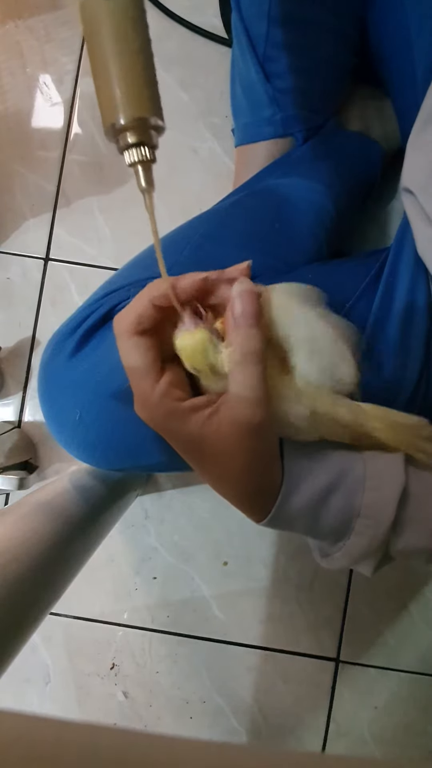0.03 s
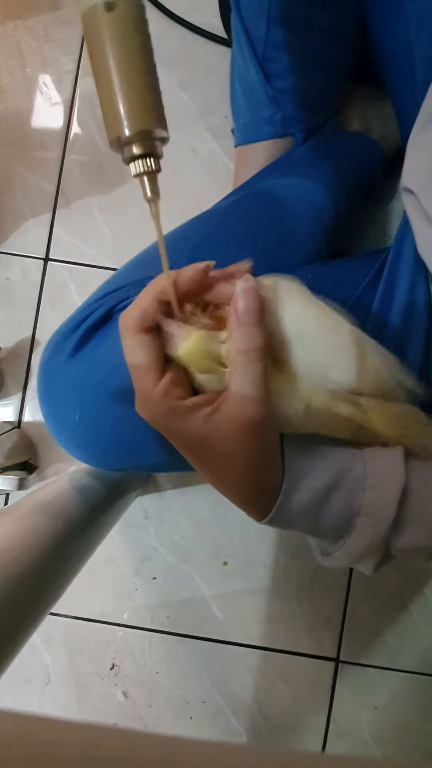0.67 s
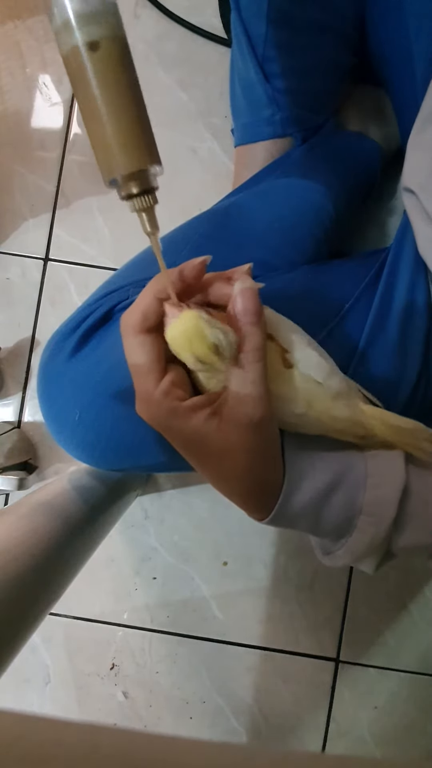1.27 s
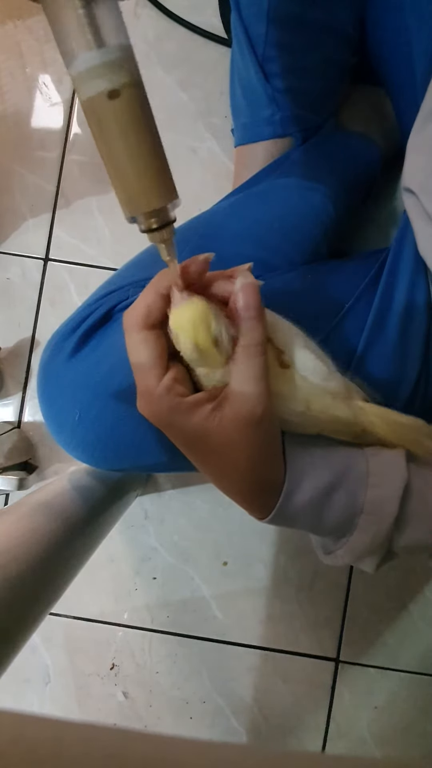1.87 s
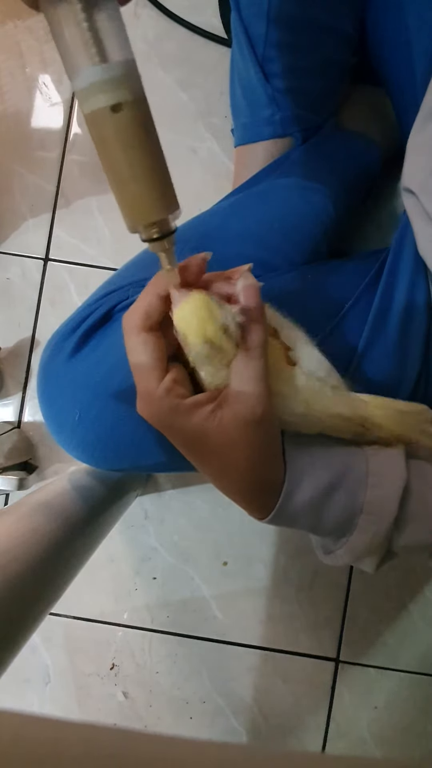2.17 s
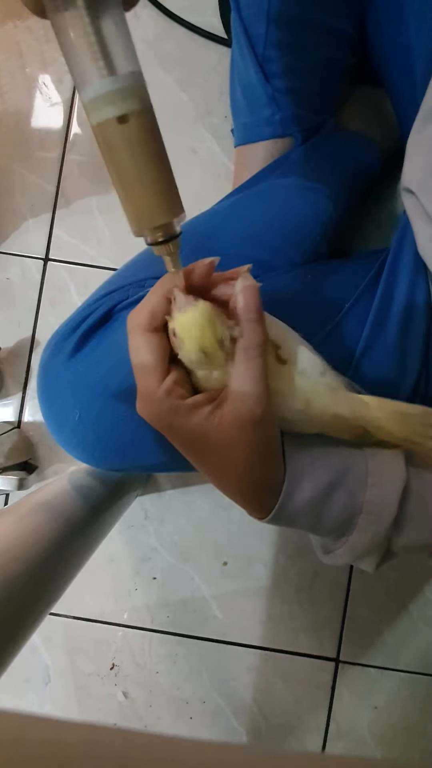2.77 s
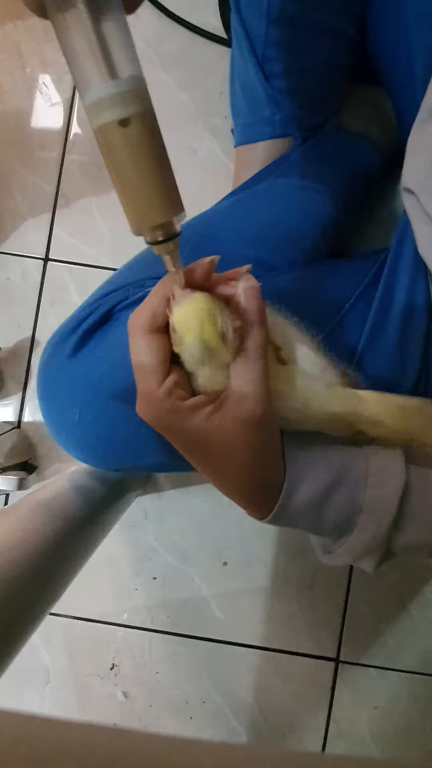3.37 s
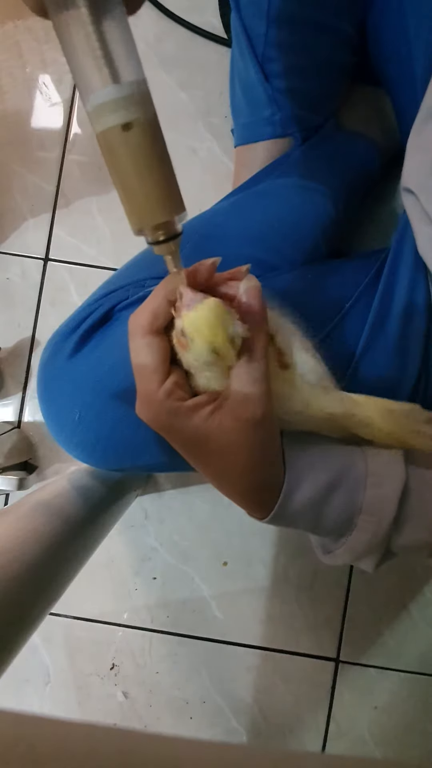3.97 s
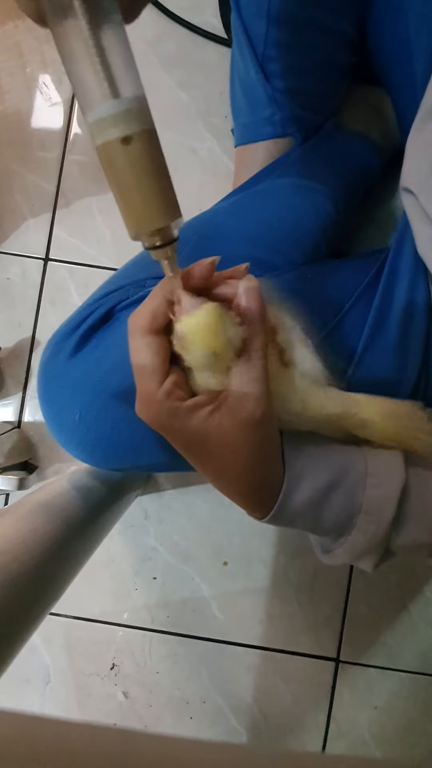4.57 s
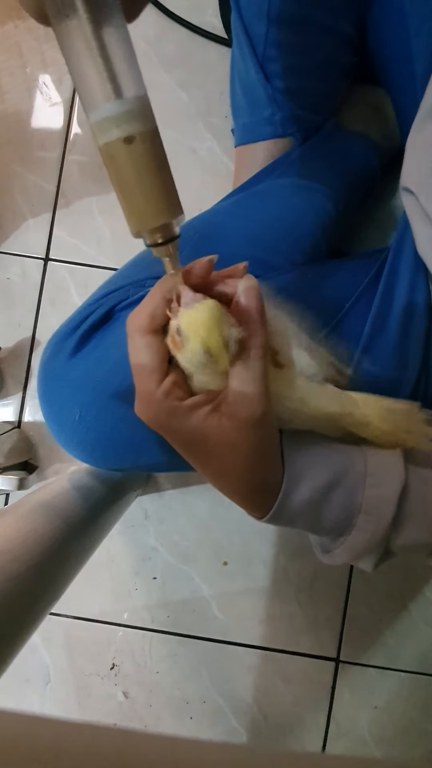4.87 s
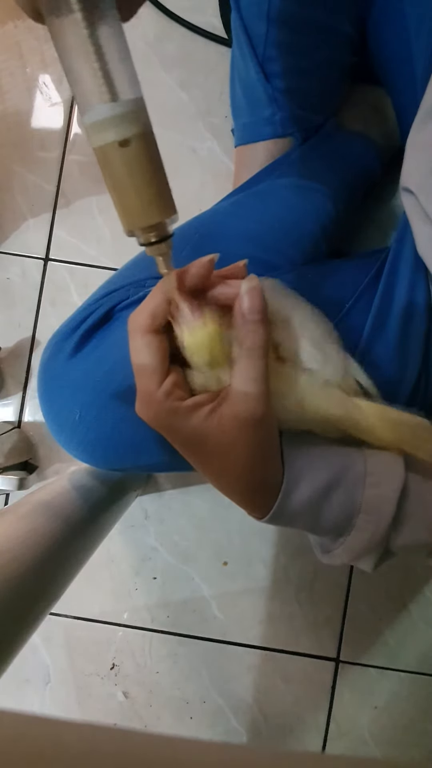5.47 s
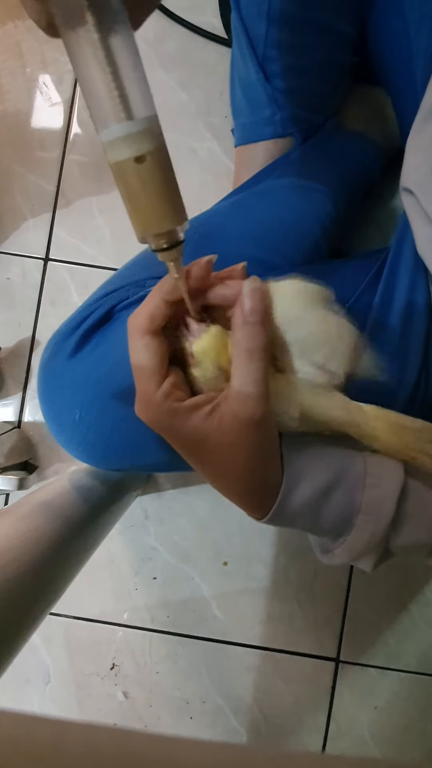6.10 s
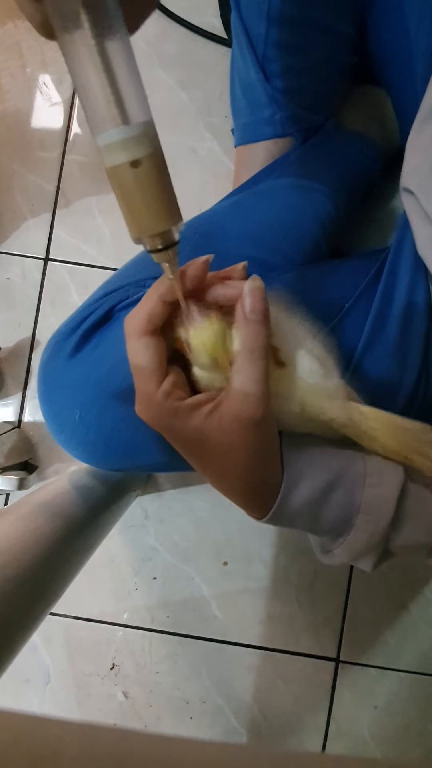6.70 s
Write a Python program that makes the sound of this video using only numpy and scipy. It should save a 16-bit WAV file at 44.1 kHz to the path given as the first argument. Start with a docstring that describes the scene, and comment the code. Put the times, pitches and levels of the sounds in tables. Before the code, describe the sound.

Close by and to the left, a hand-held chick keeps up rapid, shrill begging chirps, each arching up and breaking into a short, hoarse lower note. Early on, other chicks give a few hoarse squawks deeper in the room. The chirps grow somewhat louder in the second half, joined by faint wet ticks of the beak on a feeding tube. Light feather rustles and dull knocks come and go, with a short tiled-room echo and faint hum.

```python
"""Feeding a cockatiel chick

A chick, held in a hand and syringe-fed in a tiled room, begs six or seven times a second. Its voice
box makes each chirp: a whistle that arches up, then breaks into a short, raspier low note. Between
chirps come faint peeps and wet ticks of its beak on the tube. Farther off, other chicks squawk.
Wings brush the hand and soft bumps sound over a low rumble, a faint hum and hiss."""
import sys
import numpy as np
from scipy import signal
from scipy.fft import rfft, irfft, next_fast_len
from scipy.io import wavfile
from scipy.ndimage import uniform_filter1d, minimum_filter1d

SR = 44100
rng = np.random.default_rng(int(sys.argv[2]) if len(sys.argv) > 2 else 0)


def file_out(sig):
    """Save sig as 16-bit WAV at sys.argv[1]."""
    # one column per channel
    cols = np.atleast_2d(sig).T
    # limit, then scale
    lim = np.clip(cols, -1, 1)
    pcm = np.round(lim * 32767).astype(np.int16)
    wavfile.write(sys.argv[1], SR, pcm)


N = 297234
TIME = np.arange(N) / SR
CUTOFF_HZ = 15800
# tone colour of a squawk and its breath, as heard through the microphone: frequency_hz, level_db
SQUAWK_COLOUR = [(1500, -23.5), (3300, -2), (6000, -10), (8500, -12.5), (10000, -21), (13000, -14.5),
                 (15500, -15)]


def from_db(db):
    """Turn decibels into a gain."""
    return 10 ** (np.asarray(db) / 20)


def rms_one(x):
    """Scale a signal to an average strength (rms) of one."""
    return x / np.sqrt(np.mean(x ** 2) + 1e-20)


def at_hz(points, hz, column=1):
    """Look up a frequency in a table, blending between its rows."""
    points = np.array(points)
    return np.interp(np.log(np.maximum(hz, 1)), np.log(points[:, 0]), points[:, column])


def drift(rate, size=N):
    """A random wander of strength one, with up to about `rate` changes a second."""
    r = np.exp(-2 * np.pi * rate / SR)
    run_in = SR // 2 if size == N else SR // 20
    wander = signal.lfilter([1], [1, -2 * r, r * r], rng.standard_normal(size + run_in))
    return rms_one(wander[run_in:])


def noise(colour):
    """Stereo noise of strength one, shaped by rows of frequency_hz, level_db."""
    # how alike left and right are: frequency_hz, likeness (0 to 1)
    likeness = [(60, 1), (400, 0.42), (1000, 0.013)]
    size = next_fast_len(N)
    hz = np.fft.rfftfreq(size, 1 / SR)
    mid, side = rfft(rng.standard_normal((2, size)))
    alike = at_hz(likeness, hz)
    both = np.sqrt(1 + alike) * mid + np.sqrt(1 - alike) * side * [[1], [-1]]
    roll_off = 1 / np.sqrt((1 + (colour[0][0] / (hz + 1)) ** 6) * (1 + (hz / colour[-1][0]) ** 6))
    return rms_one(irfft(both * roll_off * from_db(at_hz(colour, hz)), size)[:, :N])


def add(track, start_s, sound):
    """Mix a sound into a track."""
    i = int(start_s * SR)
    sound, i = sound[max(-i, 0):], max(i, 0)
    track[i:i + len(sound)] += sound[:max(N - i, 0)]


def voice(hz, overtone_db, slope_db, colour, count=4):
    """The voice box makes a tone with overtones; `colour` makes each louder or softer by frequency."""
    phase, out = 2 * np.pi * np.cumsum(hz) / SR, 0
    for k in range(1, count + 1):
        level = at_hz(colour, k * hz) + (k > 1) * (overtone_db + slope_db * (k - 2))
        out = out + from_db(level) * (k * hz < SR / 2) * np.sin(k * phase)
    return np.sqrt(2) * out


def background():
    """Low rumble, faint hiss and a wavering hum."""
    # loudness of the rumble: time_s, level_db
    rumble_levels = [(0.05, -51), (0.33, -56.5), (2.17, -58), (2.6, -62), (2.83, -54.5), (5.3, -62),
                     (6.74, -59.5)]
    # colours of the rumble and the hiss: frequency_hz, level_db
    rumble_colour = [(30, -12), (68, 15.5), (110, 0), (300, -2), (520, -14.5), (1300, -27)]
    hiss_colour = [(1000, 0.5), (6000, 6), (10000, -1.5), (15000, -4)]
    # hum tones: pitch_hz, level_db, waver_db
    hum_tones = [(69.3, -86, 4.5), (370.4, -64, 1)]
    out = from_db(np.interp(TIME, *np.transpose(rumble_levels))) * noise(rumble_colour)
    out += from_db(-69) * noise(hiss_colour)
    for hz, db, waver_db in hum_tones:
        phase = 2 * np.pi * np.cumsum(hz + 2 * waver_db * drift(6.5)) / SR   # pitch wavers too
        out += np.sqrt(2) * from_db(db + waver_db * drift(27)) * np.sin(phase)
    return out


def wing_rustle(attack_s=0.023, release_s=0.059):
    """Wings brush the hand unevenly; each flutter swells, holds and dies away."""
    # flutters: start_s, level_db, length_s, treble_db
    flutters = [(0, -39, 0.13, -3), (1.166, -41, 0.055, -25), (2.39, -41.5, 0.077, -30),
                (2.782, -39.5, 0.14, 0.5), (3.047, -44.5, 0.14, -12), (4.253, -46, 0.33, -18),
                (4.613, -41.5, 0.23, -9)]
    # colour of rubbing feathers: frequency_hz, level_db
    feather_colour = [(200, -2.5), (700, 4), (1100, 0.5), (1800, 6.5), (7000, 0), (10000, -4),
                      (16000, -16.5)]
    power, tips = from_db(-53.5) ** 2, 0   # the feathers are never quite still
    for start_s, db, length_s, treble_db in flutters:
        swell = np.clip((TIME - start_s) / attack_s, 0, 1)
        stroke = from_db(db) * swell * np.exp(-np.maximum(TIME - start_s - length_s, 0) / release_s)
        power += stroke ** 2
        tips += stroke * from_db(treble_db)
    grain = from_db(-7 + 4 * drift(86))
    return grain * (np.sqrt(power) * noise(feather_colour) + tips * noise([(8000, 0), (CUTOFF_HZ, 0)]))


def squawks(low_hz=1560, jump_hz=1950, clear_s=.03, slide_s=0.057):
    """Other chicks call: a hoarse, low opening clears into a whistle near 3 kHz and slides down."""
    # squawks: crest_s, crest_hz, opening_s, opening_db, whistle_db, second_call_db
    calls = [(.092, 3194, 0.11, -20, -17.5, -21), (.38, 2730, 0.015, -60, -38, -45.5),
             (1.912, 3106, 0.11, -16.5, -20.5, -32)]
    out = np.zeros(N)
    for crest_s, crest_hz, opening_s, opening_db, whistle_db, second_db in calls:
        t = np.arange(-opening_s, slide_s, 1 / SR)   # zero at the top of the whistle
        clear = np.clip((t + clear_s) / .025 + .5, 0, 1)
        opened = np.minimum((t + opening_s) / max(opening_s - clear_s, .01), 1)
        hoarse_hz = low_hz + (jump_hz - low_hz) * opened ** 2
        whistle_hz = crest_hz * (1 - np.where(t > 0, .33, .22) * (t / slide_s) ** 2)
        rough = np.interp(t, [-.1, -clear_s - .015, -clear_s, -clear_s / 2, slide_s / 2, slide_s],
                          [.35, .6, .9, .15, .15, .4])
        hz = hoarse_hz + clear * (whistle_hz - hoarse_hz)
        hz *= 1 + rough * .06 * drift(500, len(t)) + .012 * drift(90, len(t))
        overtone_db = -25 + 16 * rough + 4 * (1 - clear) + 12 * np.maximum(t / slide_s, 0)
        tone = voice(hz, overtone_db, -7, SQUAWK_COLOUR) * (1 + .8 * rough * drift(300, len(t)))
        swell = np.clip((t + opening_s) / .03, 0, 1)
        level_db = opening_db + clear * (whistle_db - opening_db) - 8 * (1 - swell)
        tone *= from_db(level_db + 2.5 * drift(70, len(t)))
        # a second, rough call overlaps the squawk and falls in pitch
        second_hz = np.maximum(2450 - 170000 * (t + .05) ** 2, low_hz)
        second_hz *= 1 + .0473 * drift(500, len(t))
        second = voice(second_hz, -5, -4, SQUAWK_COLOUR) * np.clip(-t / .009 + .5, 0, 1)
        second *= from_db(second_db + 4 * drift(200, len(t)))
        add(out, crest_s + t[0], (tone + second) * signal.windows.tukey(len(t), .2))
    return out


def breath(calls):
    """Air rushes through the beak, louder when the squawk is louder."""
    flow = np.sqrt(np.maximum(uniform_filter1d(calls ** 2, size=176), 0))
    return flow * noise(SQUAWK_COLOUR)[0] * from_db(-20 + 4 * drift(500))


def chirps(base_hz=2300, break_hz=5450, end_hz=3300, arch=2.9):
    """A whistle climbs to its crest; as air pressure fails, it turns hoarse and breaks to a low note."""
    # begging chirps: break_s, crest_hz, whistle_s, crest_db, low_note_db, rasp_db
    begs = [(0.086, 5980, 0.0082, -12.5, -21, -35), (0.269, 7130, 0.023, -2, -9.5, -30),
            (0.552, 7000, 0.033, -2.5, -11, -26), (0.6913, 6320, 0.015, -14.5, -14.5, -26),
            (0.843, 6330, 0.018, -10.5, -12, -45), (1.0046, 6104, 0.029, -9, -18, -42),
            (1.1798, 6590, 0.023, -12.5, -9, -23), (1.3747, 5630, 0.033, -8.5, -34, -36.5),
            (1.5144, 6305, 0.028, -8, -14, -39), (1.6726, 6270, 0.034, -19, -16.5, -17.5),
            (1.8183, 6145, 0.029, -8, -16, -39), (1.976, 6240, 0.023, -17, -14, -36),
            (2.1278, 6500, 0.032, -23, -8, -15.5), (2.2845, 6715, 0.029, -6, -7, -32.5),
            (2.4297, 6180, 0.027, -11.0, -12, -32), (2.5726, 6510, 0.028, -9, -7, -26.5),
            (2.732, 6130, 0.031, -7.5, -14, -36), (2.8694, 6320, 0.034, -11, -11, -26.5),
            (3.0443, 6790, 0.033, -7.5, -13, -13.5), (3.1871, 6620, 0.029, -7.5, -6, -51),
            (3.3467, 6570, 0.03, -5, -13.5, -35.5), (3.4831, 6330, 0.027, -4.5, -11.5, -28),
            (3.6479, 6800, 0.032, -1, -14.5, -28.5), (3.7953, 6640, 0.029, -2.5, -13, -37),
            (3.9356, 6470, 0.023, -3, -6.5, -45), (4.0934, 6155, 0.029, -5, -18, -31.5),
            (4.2285, 6480, 0.03, -3.5, -14, -28.5), (4.3922, 6480.0, 0.036, -6.5, -17.5, -22),
            (4.544, 6920, 0.02, 0, -9.5, -36), (4.6975, 6424, 0.027, -6, -11.5, -36),
            (4.8462, 6500.0, 0.026, -2, -8.5, -30), (5.0118, 6670, 0.035, -3, -13.5, -28),
            (5.1645, 6610, 0.024, 0, -11, -43.5), (5.3232, 6530, 0.022, -4.5, -7, -27),
            (5.4769, 6640, 0.03, -6.5, -12, -25), (5.636, 6500, 0.032, -7.5, -7, -25),
            (5.824, 6770, 0.037, -6, -13.5, -26), (5.9856, 6800, 0.033, -3, -11, -21.5),
            (6.137, 6530, 0.025, -1.5, -12.5, -38), (6.2852, 6420, 0.027, -3, -16, -35.5),
            (6.4378, 6660, 0.03, -2, -12.5, -28.5), (6.5955, 6810, 0.026, -1.5, -8.5, -29)]
    # tone colours of a chirp and its hoarse air, as heard through the microphone: frequency_hz, level_db
    chirp_colour = [(3000, -12.5), (4000, -2.5), (8800, -7.5), (10200, -25.5), (11300, -2), (13300, -16),
                    (15500, 10)]
    rasp_colour = [(1500, -19.5), (2800, -24.5), (3800, 4.5), (6500, 1.5), (8200, -0.5), (11500, -5.5),
                   (15500, -12)]
    tones, airflow = np.zeros((2, N))
    for break_s, crest_hz, whistle_s, crest_db, low_db, rasp_db in begs:
        # a longer, higher whistle takes longer to fall
        fall_s = .0102 * (whistle_s / .022) ** .24 * (crest_hz / 6530) ** 1.64
        rise_s = max(whistle_s - fall_s, .004)
        lead_in_s = .002 + 2.2 * max(whistle_s - .03, 0)
        t = np.arange(-rise_s - lead_in_s, fall_s + .034, 1 / SR)   # zero at the crest
        after_s = np.maximum(t - fall_s, 0)
        climbing = np.clip(-t / rise_s, 0, 1)
        broken = np.clip((t - fall_s) / .0008 + .5, 0, 1)

        climb_hz = base_hz + (crest_hz - base_hz) / (1 + np.abs(t / (.0105 + rise_s * .46)) ** arch)
        sag_hz = crest_hz - (crest_hz - break_hz) * np.minimum(np.abs(t / fall_s), 1) ** arch
        push_db = low_db + 11.5   # a strong low note starts higher and sinks more slowly
        sink_s = .00483 * from_db(.7 * push_db)
        low_hz = end_hz + (4550 + 60 * push_db - end_hz) * np.exp(-after_s / sink_s)
        hz = np.where(t < 0, climb_hz, sag_hz) * (1 - broken) + broken * low_hz

        shoulder_db, dip_db = (2 * crest_db + low_db) / 3 + 4, (crest_db + low_db) / 2 - 5
        level_db = np.interp(t, [0, fall_s * .79, fall_s, fall_s + .00093],
                             [crest_db, shoulder_db, dip_db, low_db + 1])
        # pressure builds at much the same pace each time, so a late chirp starts abruptly
        swell_db = np.maximum(-20 * (np.maximum(-t, 0) / max(rise_s, .012)) ** 1.59, -34)
        fade_db = 2700 * np.maximum(after_s - .0037, 0)
        gain = from_db(level_db + swell_db - fade_db + (1 + 2.8 * climbing) * drift(120, len(t)))
        gain *= np.interp(t, [t[0], -rise_s * .9], [0, 1])

        # air hisses harder near the crest and bursts out at the break
        rasp = from_db(.85 * rasp_db) * np.interp(t, [-rise_s * .83, -rise_s * .3], [.25, 1])
        crack = broken * np.exp(-after_s / .02)
        air = (from_db(-2.5) * rasp + from_db(-17) * crack) * from_db(3 * drift(400, len(t)))
        wobble = (.003 + .018 * climbing + .015 * broken) * drift(250, len(t))
        hz *= 1 + wobble + (.008 * crack + .05 * rasp) * drift(1500, len(t))

        # overtones are strongest at the crest and the break, and die before the note does
        overtone_db = (1 - broken) * (rasp_db + 5 - 45 * (1 - hz / crest_hz)) - 3 * broken
        overtone_db += 3.5 * drift(150, len(t)) - .6 * fade_db
        # the other side of the voice box runs higher on the way up and beats against the whistle
        twin = from_db(min(rasp_db + 21, -3)) * np.exp(-((t / rise_s + .52) / .22) ** 2)
        twin *= voice(hz * 1.15, 0, 0, chirp_colour, count=1)
        start_s = break_s - fall_s + t[0]
        add(tones, start_s, gain * (voice(hz, overtone_db, -16, chirp_colour) + twin))
        add(airflow, start_s, gain * air)
    low_cut = signal.butter(12, 3100, "high", fs=SR, output="sos")
    return signal.sosfilt(low_cut, tones) + airflow * noise(rasp_colour)[0]


def peeps():
    """Faint, short peeps and blips between the chirps, each rising a little."""
    # peeps: time_s, level_db, pitch_hz, length_s
    blips = [(0.361, -40.5, 1604, 0.01), (1.099, -43.5, 1620, 0.019), (1.269, -41, 2560, 0.079),
             (1.441, -45, 1630, 0.017), (2.652, -45.5, 1650, 0.047), (2.969, -40.5, 1650, 0.013),
             (3.573, -39, 1600, 0.017), (4.322, -38.5, 1620, 0.011), (4.941, -43, 1580, 0.01),
             (5.057, -44.5, 1750, 0.0089), (5.739, -43, 1620, 0.0096), (5.923, -46.5, 2550, 0.02),
             (6.362, -45.5, 1764, 0.035), (6.532, -46, 1660, 0.025), (6.68, -39.5, 1620, 0.012)]
    out = np.zeros(N)
    for (time_s, db, hz, length_s), bend in zip(blips, rng.uniform(-0.67, 1, len(blips))):
        progress = np.linspace(0, 1, int(length_s * SR))
        glide = 1 + (.086 + .06 * bend) * (progress - .3) + .025 * drift(250, len(progress))
        tone = np.sin(2 * np.pi * np.cumsum(hz * glide) / SR)
        add(out, time_s - .003, from_db(db - 4) * np.sin(np.pi * progress ** .7) ** 2 * tone)
    return out


def bumps(attack_s=0.0081, hit_s=0.0066, tail_s=0.06):
    """Dull knocks, each with a thud of its own pitch and a light slap, dying away in the room."""
    # knocks: start_s, level_db, brightness_db, left_over_right_db, thud_hz
    knocks = [(0.45, -28.5, 5, -2.5, 480), (1.554, -31, -1, -4.5, 630), (1.762, -40.5, 6.5, -4, 574),
              (2.827, -35, -4, -3, 720), (3.085, -46.5, 6, -1, 250), (3.251, -37, 7, -4.5, 258),
              (6.111, -27.5, -3, -3, 407)]
    # colours of the dull body and the slap: frequency_hz, level_db
    body_colour = [(60, -12), (150, -13), (400, -1), (620, -1.5), (1100, -14)]
    slap_colour = [(900, 9), (1700, 19.5), (6000, -0.5), (14000, -27)]
    body, slap, thuds = np.zeros((3, 2, N))
    shaking = noise(body_colour)
    for start_s, db, bright_db, pan_db, hz in knocks:
        t = np.maximum(TIME - start_s, 0)
        decay = np.exp(-np.minimum(t / hit_s, 50)) + from_db(-6) * np.exp(-t / tail_s)
        blow = (1 - np.exp(-t / attack_s)) * decay * from_db(db + pan_db * np.array([[.5], [-.5]]))
        body += blow
        slap += blow * from_db(bright_db - 5)
        thuds += blow * rms_one(signal.lfilter(*signal.iirpeak(hz, Q=1 / .47, fs=SR), shaking))
    return from_db(-1.5) * body * noise(body_colour) + from_db(1) * thuds + slap * noise(slap_colour)


def beak_ticks(tongue_clicks_per_s=14):
    """The beak shuts on the wet tube; the tongue clicks faintly at random in between."""
    # beak touches: start_s, level_db
    ticks = [(2.639, -34), (2.9322, -31), (3.4445, -32), (3.5423, -33.5), (4.244, -29.5), (4.566, -34),
             (4.9047, -35), (5.0968, -37), (5.703, -39), (6.3395, -39), (6.491, -37.5), (6.6494, -37)]
    out = np.zeros(N)
    touches = (rng.random(N) < tongue_clicks_per_s / SR) * from_db(-55)
    for start_s, db in ticks:
        touches[int(start_s * SR)] = from_db(db - 8)
    for hz, ring_s in [(1750, 0.0074), (2250, 0.003), (3900, 0.0023)]:
        clicks = touches * from_db(-.5 * rng.standard_normal(N))
        decay, angle = from_db(-60 / (ring_s * SR)), 2 * np.pi * hz / SR
        ring = signal.lfilter([.5, 0, -.5], [1, -2 * decay * np.cos(angle), decay ** 2], clicks + 1e-18)
        out = ring - out   # neighbouring rings have opposite signs
    return out


def room(x, bands=14):
    """Dense echoes off tiles and walls; each band of frequencies dies at its own rate."""
    # the room's echo: frequency_hz, ring_s (time to fade by 60 dB), level_db
    echo = [(500, 0.39, -20), (1600, 0.62, -17), (3330, 0.2, 5.5), (5040, 0.4, -7), (6500, 0.26, -4),
            (15000, 0.33, -1)]
    t = TIME[:SR * 2 // 3]
    hz = np.fft.rfftfreq(len(t), 1 / SR)
    spectrum = rfft(rng.standard_normal((2, len(t)))) * from_db(at_hz(echo, hz, column=2))
    centres, response = np.geomspace(150, CUTOFF_HZ, bands), 0
    for centre, weights in zip(centres, np.eye(bands)):
        band = irfft(spectrum * np.interp(hz, centres, weights), len(t))
        response += band * from_db(-60 * t / at_hz(echo, centre))
    response *= np.clip((t - .002) / .00089, 0, 1) / np.sqrt(SR / 30)
    return signal.fftconvolve(x[None], response, axes=1)[:, :N]


def place(x, left_db, right_db, lag_samples=21):
    """Sound that comes straight from a bird; it reaches the right side lag_samples later."""
    return np.array([from_db(left_db) * x, from_db(right_db) * np.pad(x, (lag_samples, 0))[:N]])


def shade(x, edge_hz=6000):
    """The microphone's right opening faces away from the bird and misses some treble."""
    return np.array([x[0], signal.sosfilt(signal.butter(1, edge_hz, fs=SR, output="sos"), x[1])])


def scene():
    """The fed chick is close and to the left; the others are deep in the room."""
    chick, calls = chirps(), squawks()
    others = calls + breath(calls)
    small_sounds = peeps() + beak_ticks()
    direct = place(chick, 0, -12.5) + place(small_sounds, 9.8, -9.5)
    direct += place(others, 1.45, -5.5, lag_samples=0)
    into_room = from_db(-14) * (chick + small_sounds) + from_db(0.5) * others
    heading = 2 * drift(0.89)   # the chick's bobbing head stirs ever different echoes
    echoes = room(into_room * np.cos(heading)) + room(into_room * np.sin(heading))
    echoes *= from_db([[-2], [4.5]])
    return shade(direct + echoes + bumps() + wing_rustle()) + background()


def record(dry, notch_hz=9700, notch_width_hz=2200):
    """The microphone's openings notch the treble; a limiter turns down loud chirps; the top is cut."""
    heard = signal.lfilter(*signal.iirnotch(notch_hz, notch_hz / notch_width_hz, fs=SR), dry)
    allowed_gain = minimum_filter1d(1 / np.maximum(np.abs(heard).max(axis=0), 1), size=133)
    limited = heard * uniform_filter1d(allowed_gain, size=133)
    return signal.sosfilt(signal.ellip(10, .2, 70, CUTOFF_HZ, fs=SR, output="sos"), limited)


dry = scene()
out = record(dry)
file_out(out)
```